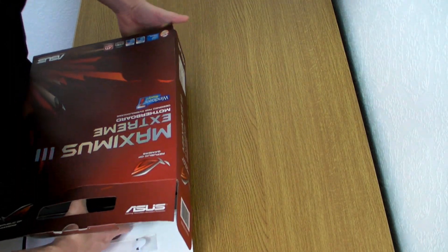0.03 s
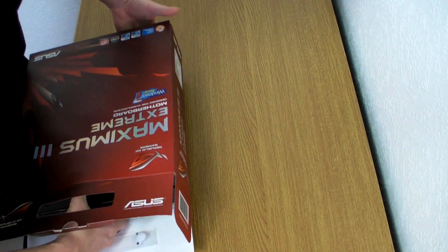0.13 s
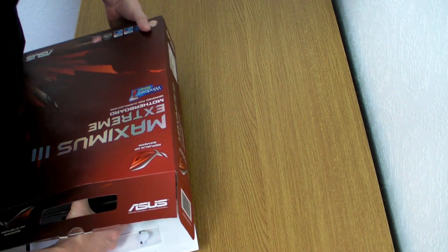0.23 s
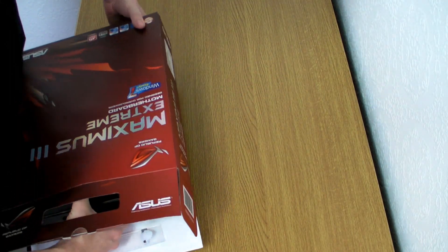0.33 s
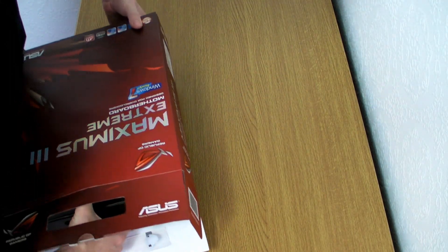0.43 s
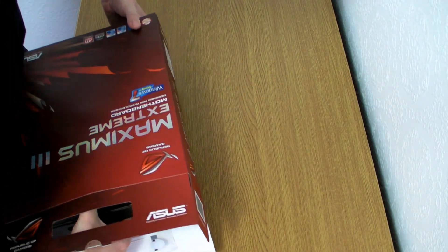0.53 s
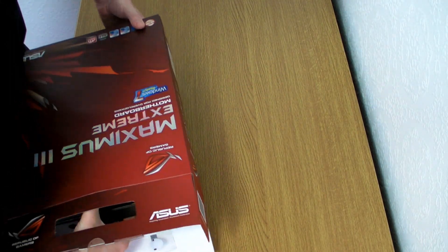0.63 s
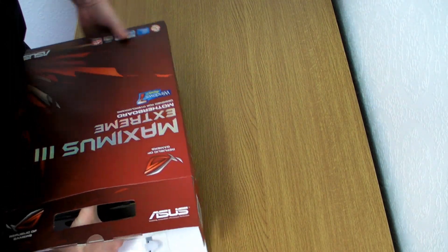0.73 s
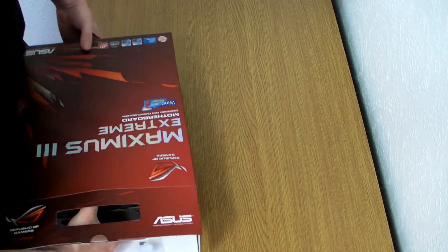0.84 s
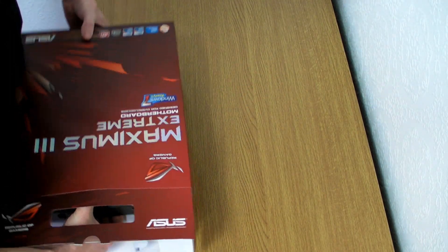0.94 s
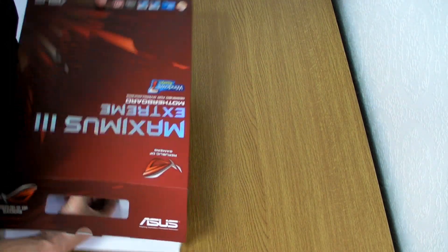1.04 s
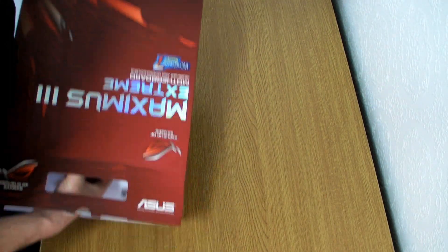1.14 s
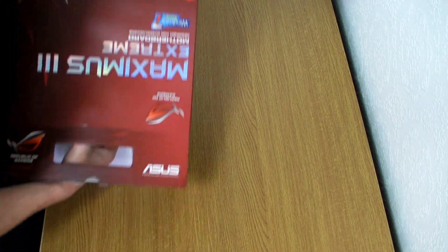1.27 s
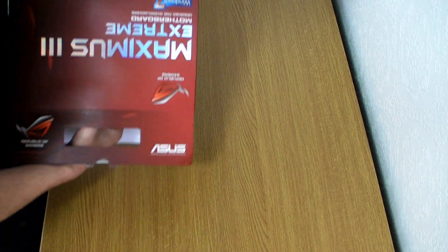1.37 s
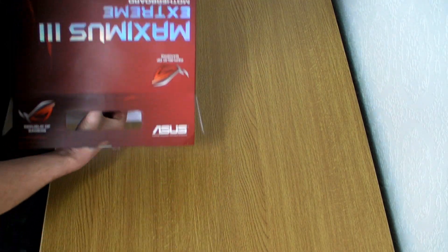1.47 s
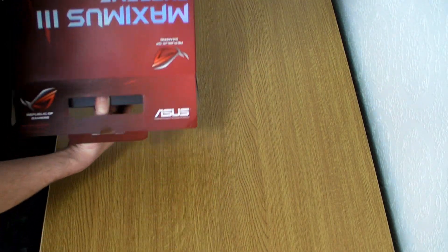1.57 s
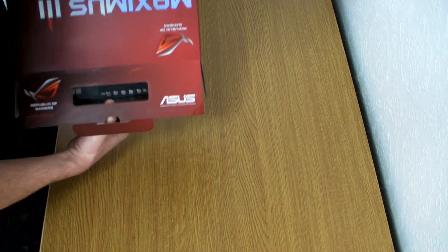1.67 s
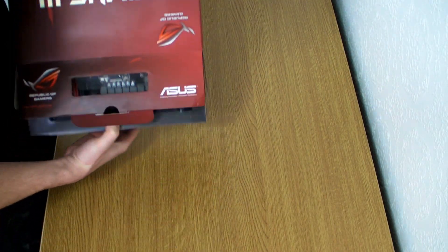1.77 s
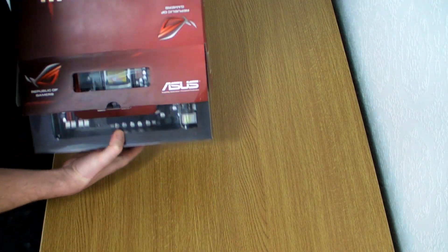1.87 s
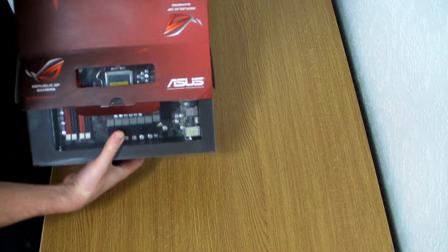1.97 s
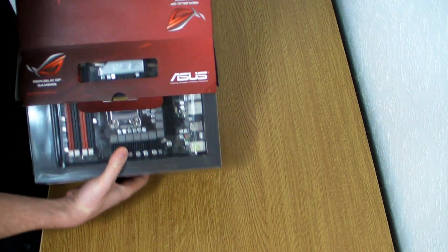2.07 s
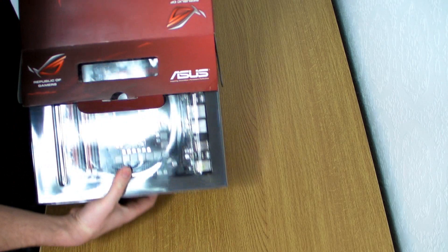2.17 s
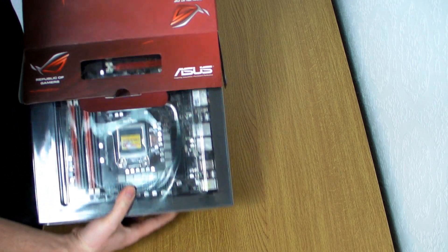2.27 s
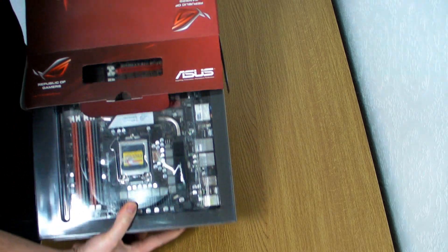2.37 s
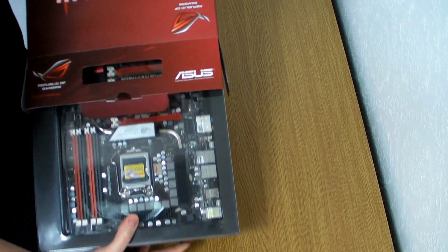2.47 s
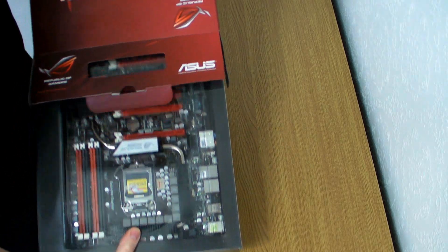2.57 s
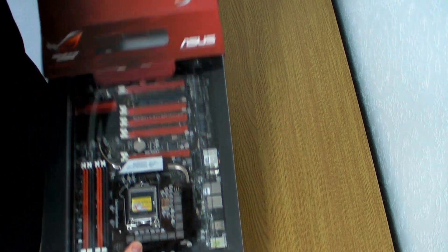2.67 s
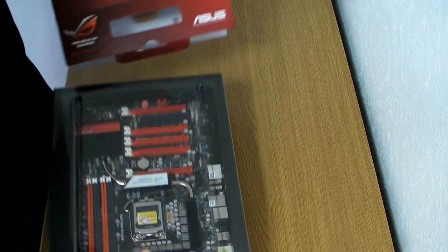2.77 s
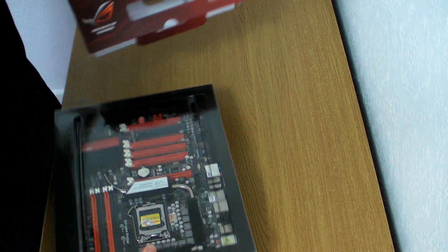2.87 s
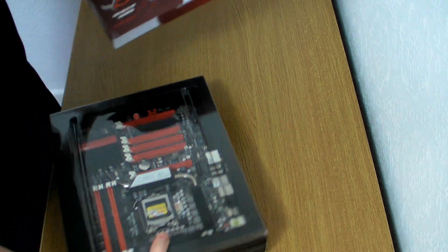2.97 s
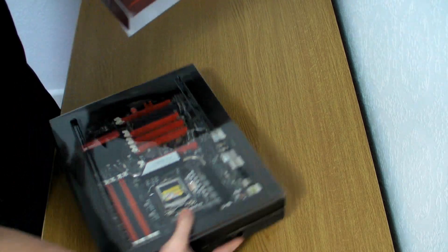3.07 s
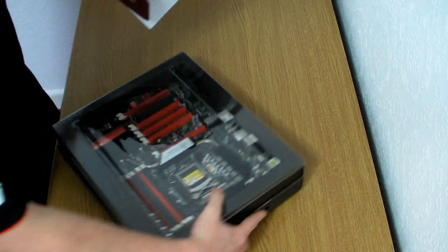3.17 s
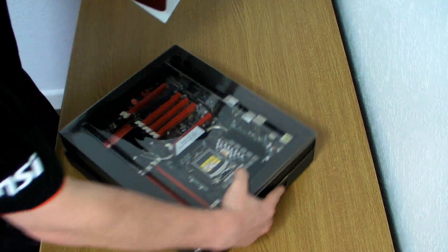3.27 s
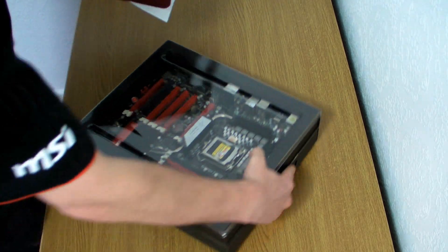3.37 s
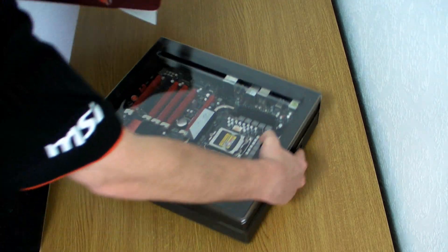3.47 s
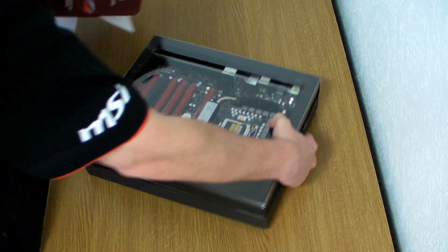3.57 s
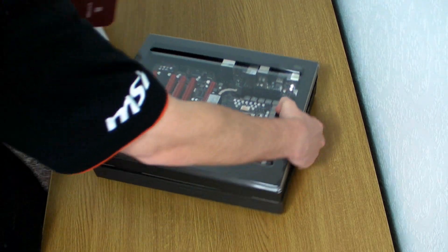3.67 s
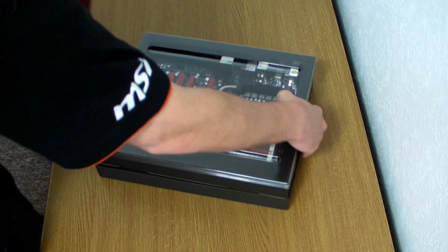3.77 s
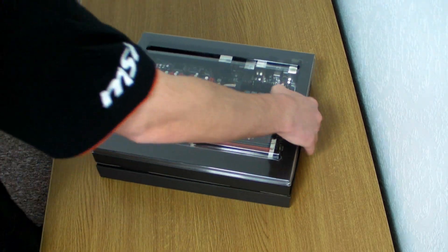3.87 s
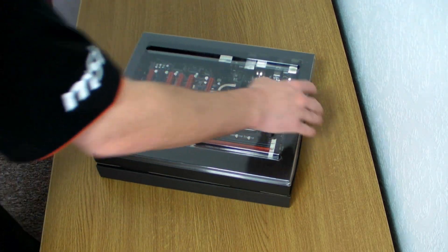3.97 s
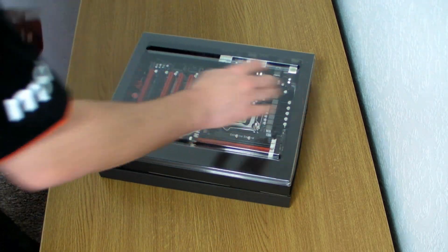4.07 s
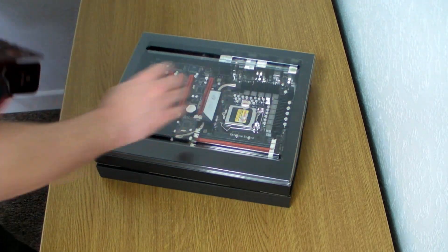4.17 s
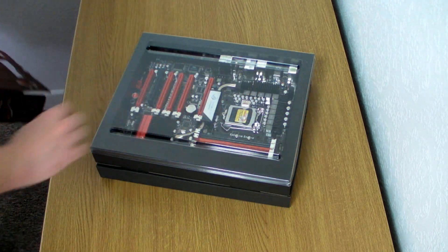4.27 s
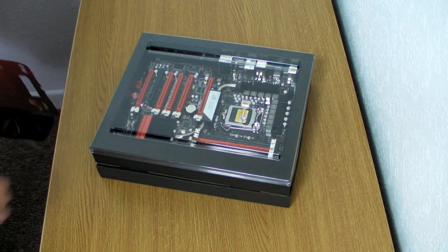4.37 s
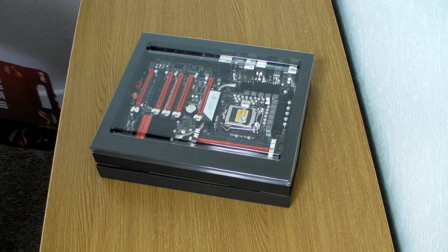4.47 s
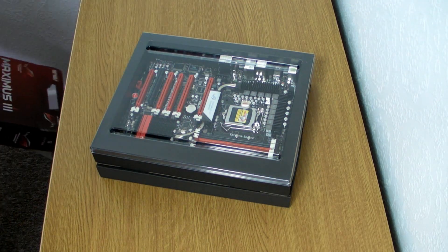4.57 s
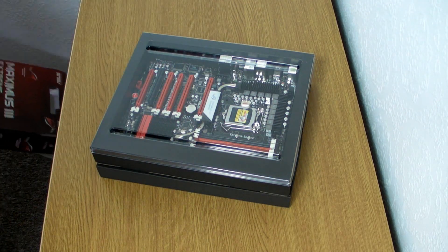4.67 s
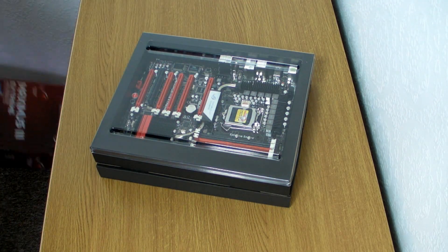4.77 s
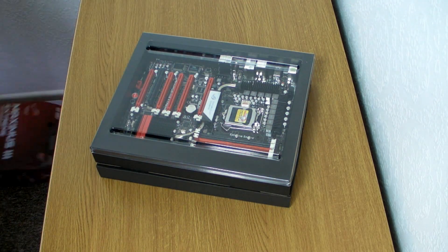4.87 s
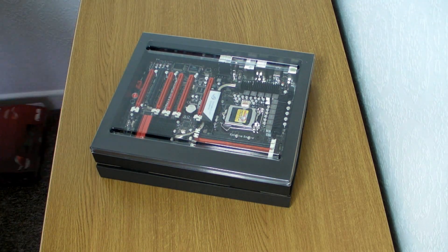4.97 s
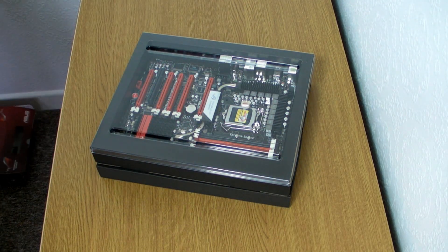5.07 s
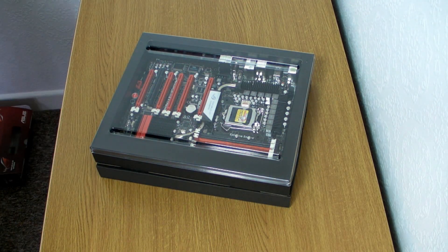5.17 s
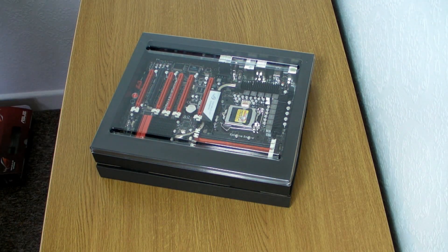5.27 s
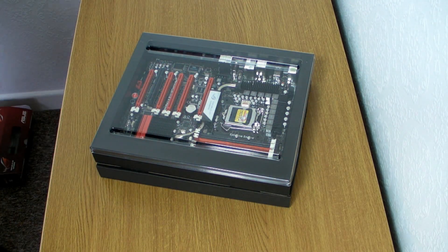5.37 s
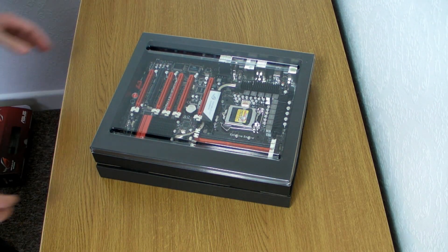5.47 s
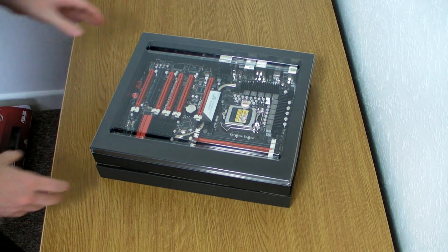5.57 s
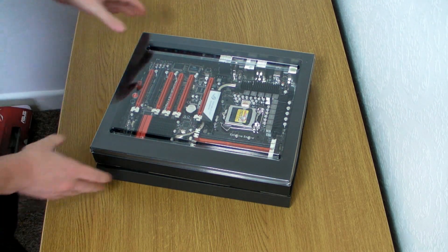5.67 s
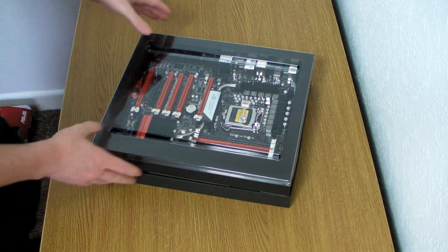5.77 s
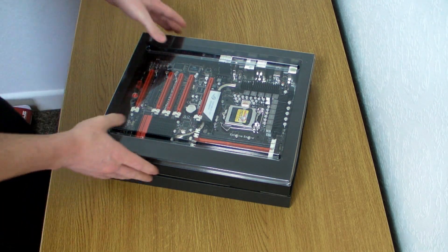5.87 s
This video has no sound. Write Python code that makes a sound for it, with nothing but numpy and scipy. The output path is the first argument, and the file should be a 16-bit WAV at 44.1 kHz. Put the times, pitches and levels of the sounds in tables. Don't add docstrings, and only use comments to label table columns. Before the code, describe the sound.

Close, dry card rubbing with small squeaks, a boxy tray set down on wood, quiet, then a loud tumbling thump of an empty carton.

```python
import sys
import numpy as np
from scipy import signal
from scipy.fft import rfft, irfft, next_fast_len
from scipy.io import wavfile

SR = 44100
rng = np.random.default_rng(int(sys.argv[2]) if len(sys.argv) > 2 else 0)


def put_to_file(sound):
    columns = np.atleast_2d(sound).T
    safe = np.clip(columns, -1, 1)
    whole_steps = np.round(safe * 32767)
    wavfile.write(sys.argv[1], SR, whole_steps.astype(np.int16))


def boost(x):
    u = np.asarray(x, float) / 20
    return 10 ** u


N = 260631

# start_s, length_s,
# first_db, last_db, pressure_db
CARD_STROKES = [(0, 0.011, -33, -41.5, 6.5), (0.119, .05, -42.5, -49.5, -5), (.2, 0.088, -60, -51, 5),
                (0.32, .1, -52.5, -52.5, -11), (0.456, 0.13, -42.5, -55, -1.5),
                (0.584, 0.16, -51.5, -56.5, -0.5), (0.794, 0.07, -49, -53, 3), (0.94, 0.019, -34, -39, 6.5),
                (1.043, 0.31, -54, -54.5, 5.5), (1.49, 0.11, -55, -38, 3),
                (1.616, 0.32, -40.5, -38.5, -1.5), (1.985, 0.41, -43.5, -43.5, 2.5),
                (2.455, 0.2, -51, -42, 1), (2.684, 0.1, -41.5, -47.5, 6), (2.814, 0.043, -49.5, -59, 19),
                (3.008, .03, -45.5, -48, 17), (3.144, 0.048, -47, -53.5, 16),
                  (3.217, 0.09, -49, -53.5, -1), (3.34, 0.29, -56, -62, 5),
                  (3.574, 0.057, -55.5, -47.5, -2), (3.646, 0.18, -53, -53.5, 3.5),
                  (3.874, 0.062, -44, -54, 13.5), (4.04, .05, -86, -80, 19), (4.235, 0.035, -58, -62, 3),
                  (4.444, 0.48, -68, -63, 2), (4.734, 0.15, -55, -62, -22), (4.937, 0.082, -34, -34.5, -2),
                  (5.053, 0.072, -61, -48, 12), (5.192, 0.23, -60, -57.5, 2.5), (5.613, .13, -70, -70, 5),
                  (5.761, 0.026, -54, -59.5, -2), (5.9, .02, -60, -59, 7)]
# start_s, length_s, box_db, desk_db
WEIGHT_SHIFTS = [(0.117, 0.046, -49, -60), (0.202, 0.041, -66, -45), (0.735, .02, -52, -64),
                 (.935, 0.018, -38, -45), (1.102, 0.018, -60, -51), (1.19, 0.032, -48, -67),
                 (1.604, 0.061, -47, -63), (1.857, 0.027, -41, -57), (1.946, 0.016, -39, -41.5),
                 (2.69, .07, -39, -46.5), (2.86, .01, -57, -67), (2.962, 0.011, -28, -59),
                 (2.995, 0.018, -42, -45), (3.158, 0.039, -43, -45), (3.288, 0.055, -47, -55.5),
                 (3.57, 0.16, -59, -54), (3.874, 0.058, -38, -40.5), (4.07, 0.022, -56, -55.5),
                 (4.424, 0.0092, -73, -75), (4.75, 0.018, -59.5, -69), (4.931, .04, -42, -28),
                 (5.022, 0.024, -40, -27.5), (5.385, .03, -66, -74), (5.87, .02, -68, -63)]
GRIP_DB_PER_S, LET_GO_DB_PER_S = 611, 174
JOLT_RISE_DB_PER_S, JOLT_FALL_DB_PER_S = 1100, 166
SCRAPE_DB, RUMBLE_DB, SHUDDER_DB = -5.5, -5, -14
RUMBLE_GROWS, SHUDDER_GROWS = 0.89, 0.55
# pitch_hz, level_db
FIBRE_HISS = [(710, -49), (1250, -5.5), (3800, -4), (7450, -5), (8120, -7), (11900, -10), (13400, -6.5),
              (15600, -16)]
# pitch_hz, level_db
PANEL_SCRAPE = [(250, -24), (500, -0.5), (900, 0.5), (1600, -3.5), (3000, -12.5), (6000, -31.5),
                (12000, -33)]
# pitch_hz, width_hz, level_db
BOX_MODES = [(350, 95, -6.5), (455, 85, -1.5), (700, 85, -22.5)]
# pitch_hz, width_hz, level_db
DESK_MODES = [(69.5, 36, -11), (120, 92, -2), (160.4, 65, 0), (241, 31, -0.5)]

# peak_s, level_db, panel_hz, crack_db, thud_db
SLEEVE_KNOCKS = [(0.002, -26.5, 813, -7, -29.5), (0.013, -38, 990, -15, -23),
                 (0.154, -27.5, 455, -27, -4.5), (0.192, -36.5, 450, -26, -13),
                 (0.226, -36.5, 515, -3, -15), (0.453, -41.5, 478, 0, -16), (0.786, -37.5, 980, -16, -23),
                 (0.829, -47, 455, -16, -21), (0.923, -25, 625, -0.5, -18.5), (0.944, -22, 703, -16, -22),
                 (0.964, -22, 630, -8, -31), (0.989, -28, 603, -5.5, -34), (1.203, -34, 392, -9.5, -14),
                 (1.284, -41.5, 437, -12, -12), (1.58, -29, 340, -7, -33), (1.93, -21, 1205, -7.5, -19.5),
                 (1.945, -25.5, 810, -16, -23), (1.968, -29, 378, -2, -30), (2.512, -36.5, 445, -7, -23)]
# peak_s, level_db, panel_hz, crack_db, thud_db
TRAY_KNOCKS = [(2.689, -28.5, 405, -24, -6), (2.719, -25.5, 456, -7, -5.5), (2.751, -20, 426, -12, -33),
               (2.785, -24.5, 460, -5.5, -13.5), (2.799, -24, 410, -13, -28), (2.864, -36.5, 438, -25, -22),
               (2.958, -19.5, 510, -27, -12), (3.003, -20, 470, -9, -20), (3.009, -15.5, 403, -11.5, -7.5),
               (3.018, -22.5, 440, -12, -18), (3.136, -25.5, 890, -11.5, -19), (3.141, -19, 429, -19, -22),
               (3.391, -39, 447, -19, -16), (3.554, -36, 413, -23, -23), (3.865, -26.5, 488, -12, -16),
               (3.884, -20.5, 526, -15, -9.5), (3.929, -32, 466, -6, -20)]
# peak_s, level_db, panel_hz, crack_db, thud_db
DROP_KNOCKS = [(4.216, -59, 383, 3, -21), (4.438, -60, 398, -5, -5), (4.536, -56.5, 425, 2.5, -27),
               (4.726, -48, 440, -10, -31), (4.757, -54, 437, -20, -17), (4.921, -23, 550, -6.5, -16),
               (4.938, -14.5, 456, -15, -16.5), (4.954, -13.5, 447, -19, -13), (4.969, -14, 472, -9.5, -21),
               (4.984, -20.5, 520, 0.5, -12.5), (5.009, -15, 331, -9, -18), (5.024, -18.5, 486, -10, -8),
               (5.039, -17.5, 650, -14.5, -14.5), (5.074, -19.5, 400, -11, -32),
               (5.873, -41, 570, -10, -26)]
SLEEVE_THUD_HZ, TRAY_THUD_HZ, DROP_THUD_HZ = 210, 254, 175
THUD_SCATTER = 0.11
# pitch_hz, level_db
CRACK_COLOUR = [(400, -12), (1000, 8.5), (2500, 2.5), (5000, -4.5), (8000, -12.5), (15000, -70)]
# start_s, level_db, pitch_hz, fade_60db_s
FLAT_LANDINGS = [
    (2.47, -53, 52, .25),
    (3.585, -46, 90, .2),
    (3.69, -50, 80, .2),
    (3.9, -37, 130, 0.24),
    (4.435, -50, 109, 0.11),
    (5.004, -24, 75.6, 0.28),
    (5.36, -54, 62, 0.23),
]

# start_s, level_db, pitch_hz, fade_60db_s, glide_per_s
FACE_SQUEAKS = [(.488, -39, 1100, 0.053, 4), (1.608, -41, 4380, 0.12, 0.7), (1.657, -24, 2250, 0.049, 5),
                (1.675, -36, 2160, .15, -2), (1.768, -34, 1290, 0.19, .3), (1.805, -41.5, 1324, 0.14, 1),
                (1.779, -35, 3750, .07, 1), (1.848, -39, 1340, .07, 0), (1.73, -46, 3300, 0.059, 1),
                (1.808, -45, 2640, 0.093, -3), (1.902, -34, 4300, .04, 10), (2.345, -41.5, 3660, 0.11, 0.5),
                (2.6, -39, 1870, .06, -3), (4.968, -22.5, 1780, 0.049, 0.5), (5.765, -53, 1870, 0.16, -1)]
# start_s, level_db, pitch_hz, fade_60db_s, glide_per_s
FINGER_CHIRPS = [
    (.114, -33, 3760, 0.086, 0),
    (.15, -35.5, 4110, 0.073, 0),
    (.925, -28.5, 7020, 0.14, 0.0041),
    (4.86, -45, 5020, .05, 0),
]
SQUEAK_ROUGH, CHIRP_ROUGH = 0.03, 0.3

# pitch_hz, fade_60db_s
ROOM_FADE = [(100, 0.28), (500, 0.46), (3000, 0.44), (12000, 0.15)]
# pitch_hz, likeness_0_to_1
NEAR_LIKENESS = [(30, .85), (60, .98), (300, .987), (700, .965), (1500, .89), (3100, .6), (6800, .2),
                 (15000, .12)]
# pitch_hz, likeness_0_to_1
AIR_LIKENESS = [(60, 0.17), (240, 0), (950, 0.19), (3770, 0.077), (15000, 0.0)]
# pitch_hz, level_db
AIR_COLOUR = [(18, -51), (30, -5), (85, -3), (263, -5.5), (456, 2.5), (658, -4), (2570, -8.5),
              (10300, -15.5), (11700, -20), (13400, -14.5), (15600, -27)]
# pitch_hz, width_hz, level_db
MIC_COLOUR = [(455, 43, 1.5), (8120, 220, -6.5), (12000, 1600, -2)]
NOTCH_HZ, TOP_HZ = 8000, 15720


def unit(x):
    return x / np.sqrt(np.mean(x ** 2) + 1e-20)


def along(points, hz):
    f, v = np.transpose(points)
    return np.interp(np.log(hz + 1), np.log(f + 1), v)


def filtered(x, response):
    n = x.shape[-1]
    m = next_fast_len(n + SR // 16)
    return irfft(rfft(x, m) * response(np.fft.rfftfreq(m, 1 / SR)), m)[..., :n]


def resonant(modes):
    def response(f):
        total = 0
        for k, (hz, width, db) in enumerate(modes):
            mode = 1j * f * width / (hz * hz - f * f + 1j * f * width)
            total = total + (-1) ** k * boost(db) * mode
        return total
    return response


def coloured(x, spectrum):
    return unit(filtered(x, lambda hz: boost(along(spectrum, hz))))


def wobble(rate):
    knots = int(N * rate / SR) + 2
    return np.interp(np.arange(N) * rate / SR, np.arange(knots), rng.standard_normal(knots))


def ports(pair, likeness):
    def mid_side(hz):
        turn = np.arccos(np.clip(along(likeness, hz), -1, 1)) / 2
        return np.array([np.cos(turn), np.sin(turn)])
    mid, side = filtered(pair, mid_side)
    return np.array([mid + side, mid - side])


def rubbing():
    strokes = CARD_STROKES
    press_db = np.transpose(strokes)[4]
    box_db, desk_db = np.transpose(WEIGHT_SHIFTS)[2:]
    power = np.array([contact(*row[:4], GRIP_DB_PER_S, LET_GO_DB_PER_S) for row in strokes])
    jolts = np.array([contact(*row[:2], 0, 0, JOLT_RISE_DB_PER_S, JOLT_FALL_DB_PER_S)
                      for row in WEIGHT_SHIFTS])

    def gain(p):
        return np.interp(np.arange(N), np.arange(0, N, 32), np.sqrt(p))

    hiss = gain(power.sum(axis=0)) * coloured(catches(0.38), FIBRE_HISS)
    scrape = gain(boost(2 * (SCRAPE_DB + press_db)) @ power) * coloured(catches(2.8), PANEL_SCRAPE)

    box_press = boost(2 * (RUMBLE_DB + RUMBLE_GROWS * press_db)) @ power
    box_gain = gain(box_press + boost(2 * box_db) @ jolts)
    rumble = box_gain * boost(-3.5) * unit(filtered(catches(3.45), resonant(BOX_MODES)))

    def desk(f):
        return resonant(DESK_MODES)(f) / (1 + (f / 300) ** 4) / (1 + (70 / (f + 1)) ** 4)

    desk_press = boost(2 * (SHUDDER_DB + SHUDDER_GROWS * press_db)) @ power
    desk_gain = gain(desk_press + boost(2 * desk_db) @ jolts)
    shudder = desk_gain * boost(-5.5) * unit(filtered(catches(2.7), desk))
    return hiss + scrape + rumble + shudder


def catches(clump_db):
    return rng.laplace(size=(2, N)) * boost(clump_db * (wobble(50) + wobble(250)))


def contact(s, length, first_db, last_db, rise, fall):
    t = np.arange(0, N, 32) / SR - s
    held_db = first_db + (last_db - first_db) * np.clip(t / max(length, 1e-3), 0, 1)
    return boost(2 * (held_db + rise * np.minimum(t, 0) - fall * np.maximum(t - length, 0)))


def knocks(rows, desk_hz):
    out = np.zeros((2, N + SR))
    t = np.arange(SR // 10) / SR
    push = boost(-60 * t / 0.11) * (1 - np.exp(-t / 0.0034))
    snap = boost(-60 * t / 0.096) + 0.51 * boost(-60 * t / 0.0014)
    for s, db, hz, crack_db, thud_db in rows:
        force, scuff = rng.standard_normal((2, 2, len(t)))
        thud_hz = desk_hz * np.exp(THUD_SCATTER * rng.standard_normal())
        panel_modes = [(hz, 0.43 * hz, 0), (1.95 * hz, 1.04 * hz, -4), (3.12 * hz, 0.78 * hz, -9)]
        wall = filtered(force * push, resonant(panel_modes))
        ring = boost(-60 * t * hz / 30) * (1 - np.exp(-t / 0.0017)) * np.sin(2 * np.pi * hz * t)
        thud_shape = boost(-60 * t * thud_hz / 14) * (1 - np.exp(-t / 0.0059))
        thud = thud_shape * np.sin(2 * np.pi * thud_hz * t)
        panel = boost(-3) * wall / np.abs(wall[0]).max() + boost(0.5) * ring
        crack = coloured(scuff, CRACK_COLOUR) * snap
        blow = panel + boost(crack_db - 0.5) * crack + boost(thud_db + 13.5) * thud
        start = max(round((s - 0.002) * SR), 0)
        out[:, start:start + len(t)] += boost(db) * blow
    return out[:, :N]


def boom():
    s, db, hz, t60 = np.transpose(FLAT_LANDINGS)[..., None]
    t = np.maximum(np.arange(N) / SR - s, 0)
    shape = boost(db - 60 * t / t60) * (1 - np.exp(-t / 0.0064))
    return np.sum(shape * np.sin(2 * np.pi * hz * t), axis=0)


def squeaks(rows, rough):
    out = np.zeros(N + SR)
    t = np.arange(SR // 6) / SR
    for s, db, hz, t60, glide in rows:
        wander = np.cumsum(rough * rng.standard_normal(len(t)))
        phase = 2 * np.pi * hz * (t + glide * t ** 2 / 2) + wander
        shape = boost(db - 60 * t / t60) * (1 - np.exp(-t / 0.00041))
        out[round(s * SR):][:len(t)] += shape * np.sin(phase)
    return out[:N]


def room(x, wet_db):
    step = SR // 3
    out = np.zeros((2, N + 2 * SR))
    fade = np.hanning(2 * step + 1)[:-1]
    padded = np.pad(x, ((0, 0), (step, 2 * step)))
    for start in range(0, N + step, step):
        hz, t, z = signal.stft(rng.standard_normal((2, SR // 2)), SR, nperseg=256)
        dying = z * boost(-60 * t / along(ROOM_FADE, hz)[:, None])
        tail = signal.istft(dying, SR, nperseg=256)[1][:, :SR // 2]
        tail = tail / np.linalg.norm(tail[0])
        piece = signal.fftconvolve(padded[:, start:start + 2 * step] * fade, tail, axes=1)
        out[:, start:start + piece.shape[1]] += piece
    return x + boost(wet_db) * out[:, step:step + N]


def quiet_air():
    return boost(-59.5) * coloured(ports(rng.standard_normal((2, N)), AIR_LIKENESS), AIR_COLOUR)


def scene():
    blows = knocks(SLEEVE_KNOCKS, SLEEVE_THUD_HZ) + knocks(TRAY_KNOCKS, TRAY_THUD_HZ)
    blows = blows + knocks(DROP_KNOCKS, DROP_THUD_HZ) + boom()
    slips = squeaks(FACE_SQUEAKS, SQUEAK_ROUGH) + squeaks(FINGER_CHIRPS, CHIRP_ROUGH)
    handling = rubbing() + boost(-2.0) * blows + boost([[0], [-4]]) * slips
    return ports(room(handling, wet_db=-7), NEAR_LIKENESS) + quiet_air()


def band_limit(x):
    return signal.sosfilt(signal.butter(12, 15780, fs=SR, output="sos"), x)


def record(dry):
    def microphone(f):
        bumps_db = sum(db * np.exp(-((f - hz) / width) ** 2) for hz, width, db in MIC_COLOUR)
        notch_db = -40 * np.exp(-((f - NOTCH_HZ) / 45) ** 2)
        band = (f < TOP_HZ) / (1 + (45 / (f + 1)) ** 4)
        return boost(bumps_db + notch_db) * band
    mix = filtered(dry, microphone) * boost([[-0.2], [0.2]])
    return band_limit(mix)


dry = scene()
out = record(dry)
put_to_file(out)
```